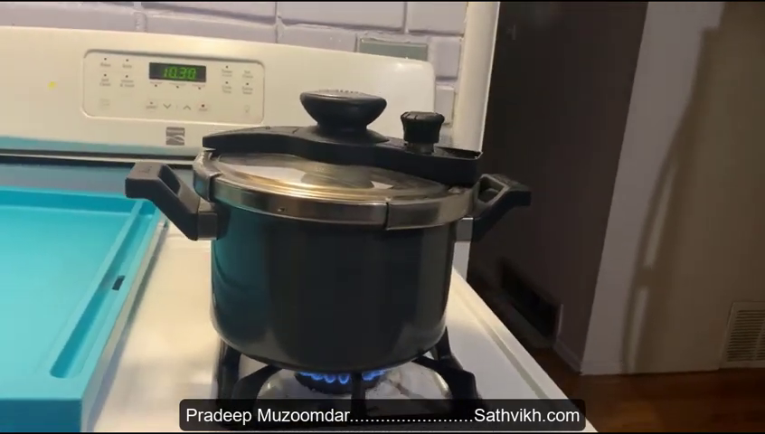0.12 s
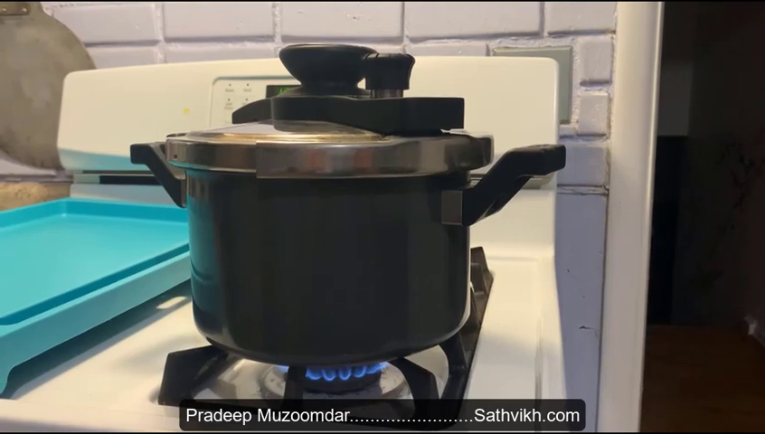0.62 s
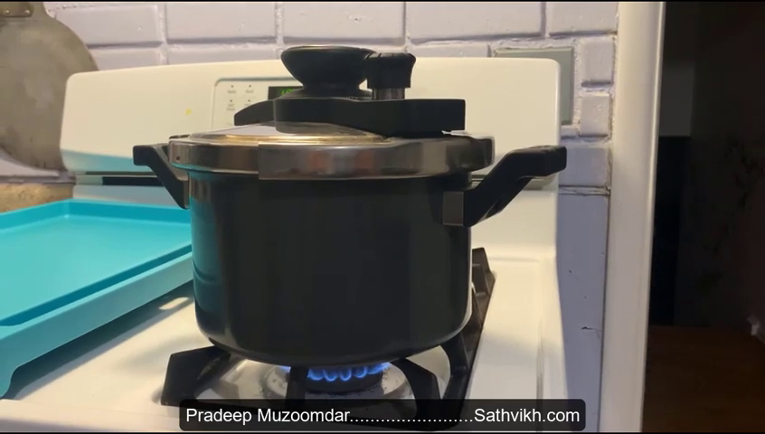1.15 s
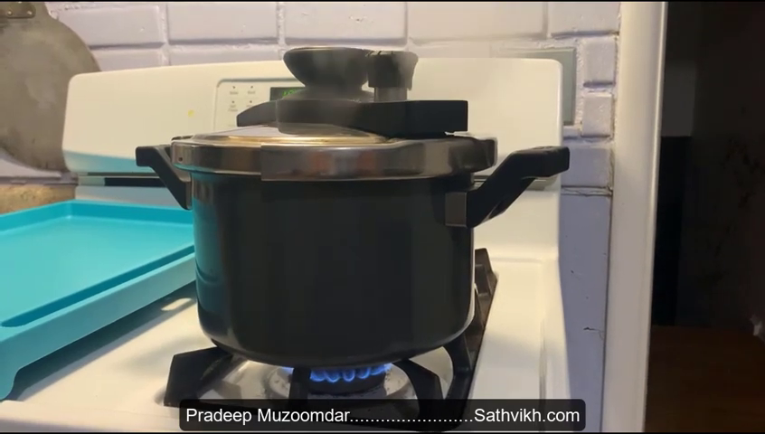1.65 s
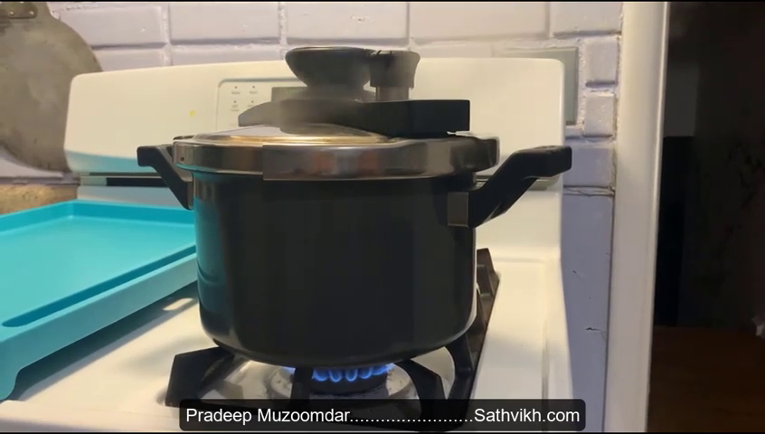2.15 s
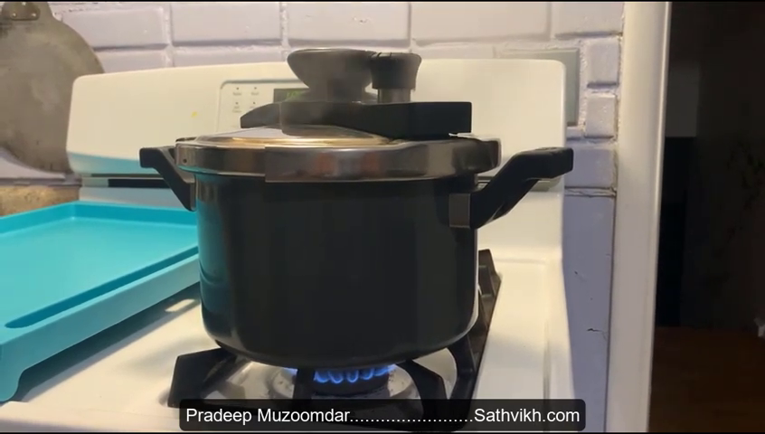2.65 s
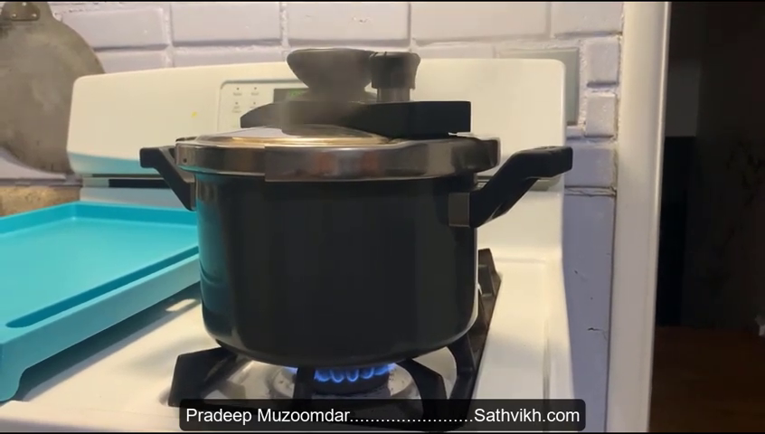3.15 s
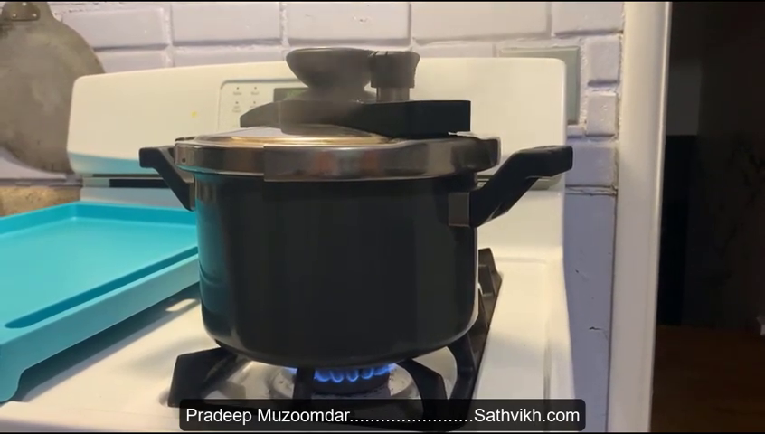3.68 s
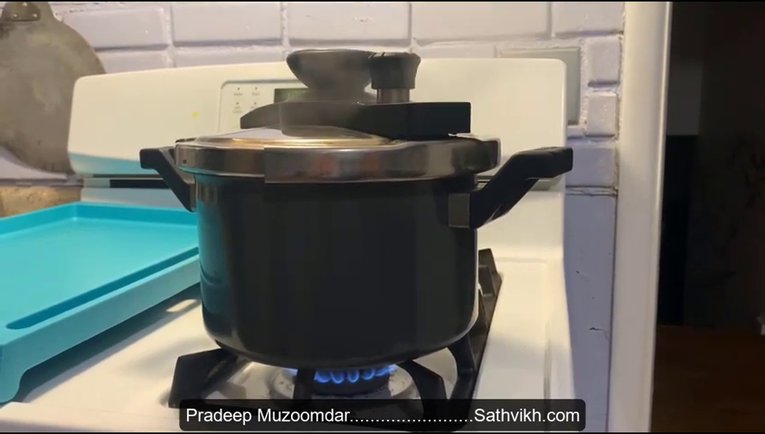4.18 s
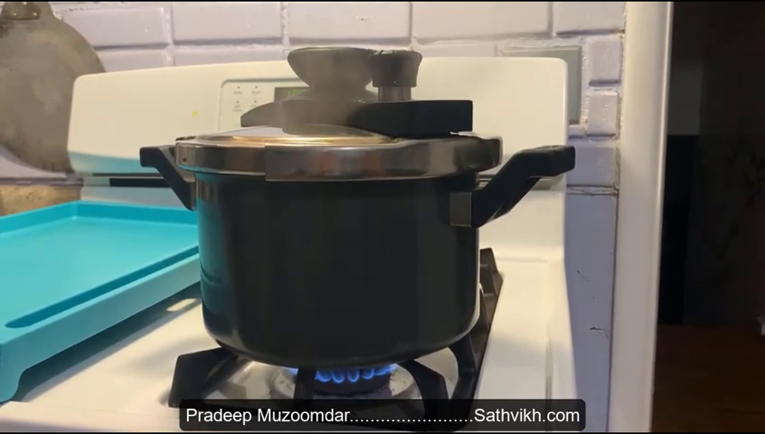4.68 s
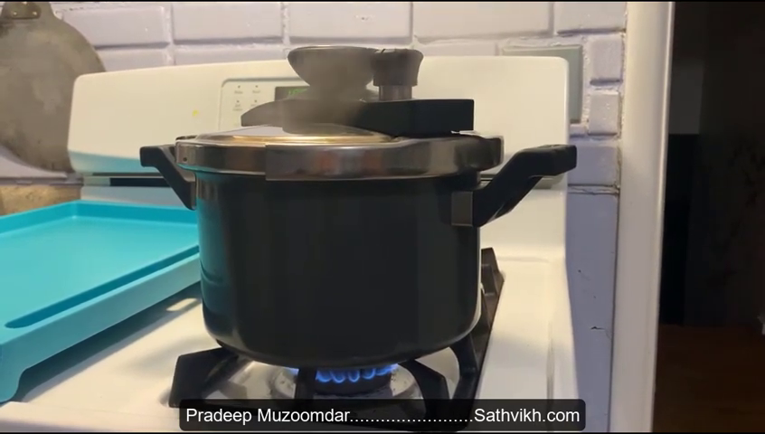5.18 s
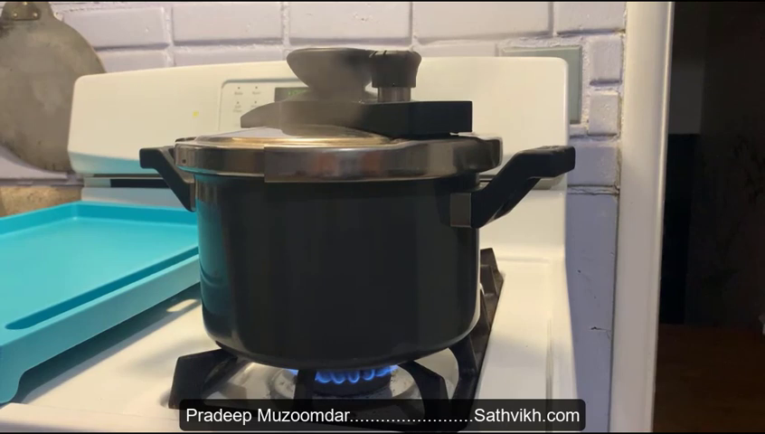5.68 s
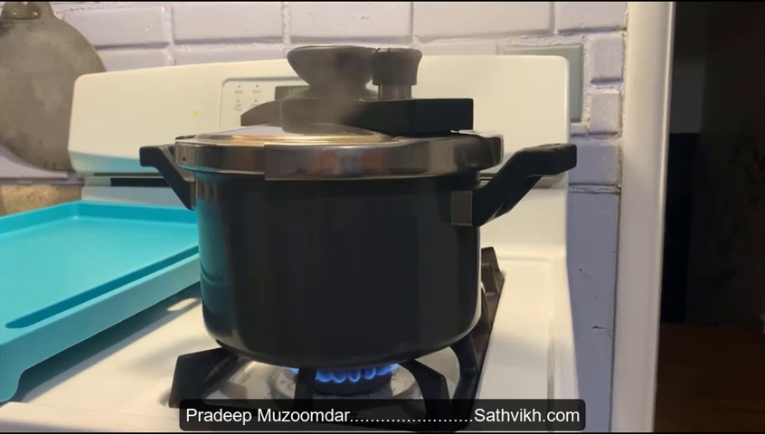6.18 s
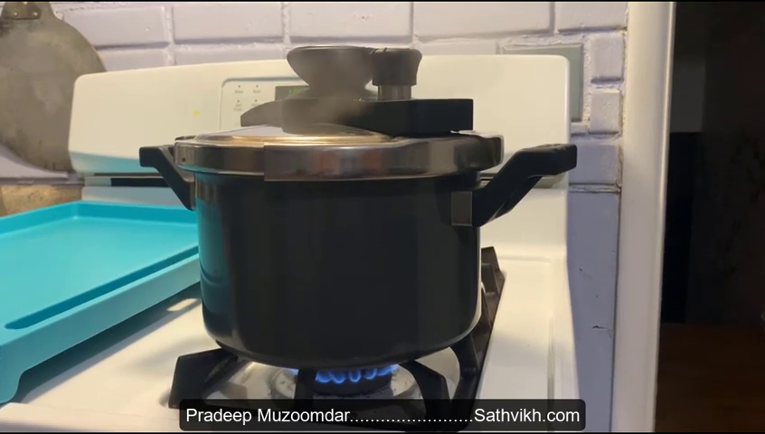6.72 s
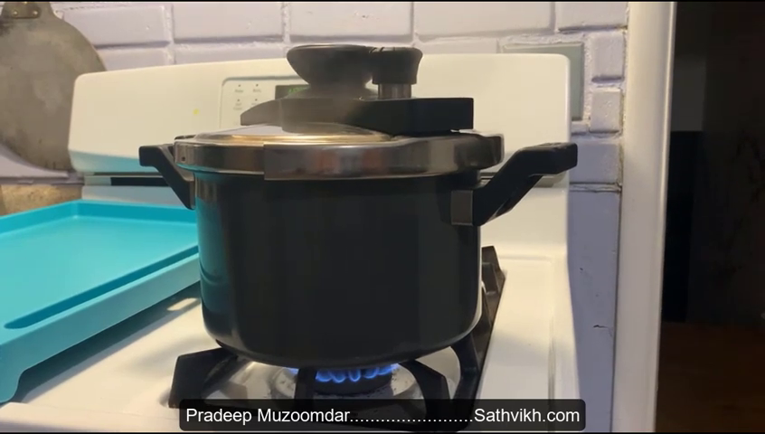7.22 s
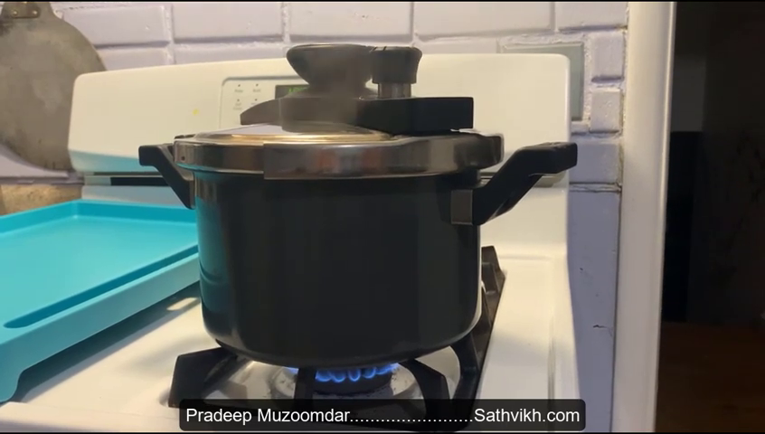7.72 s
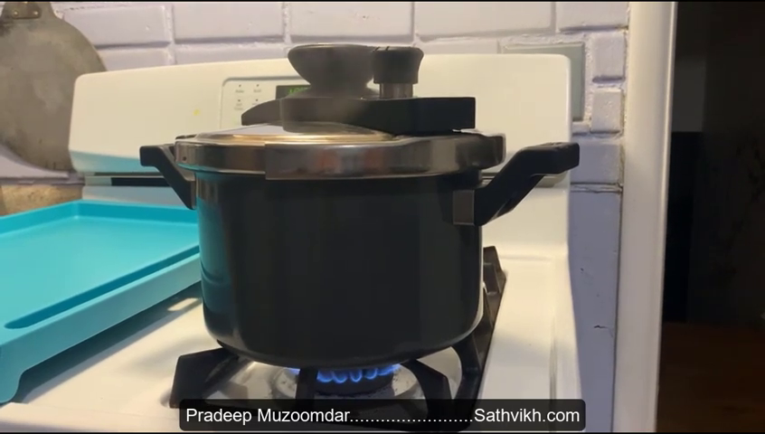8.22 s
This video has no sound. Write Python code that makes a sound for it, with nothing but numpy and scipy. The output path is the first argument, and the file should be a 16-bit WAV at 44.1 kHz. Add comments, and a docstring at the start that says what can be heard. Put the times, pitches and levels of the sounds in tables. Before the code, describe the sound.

A handheld stereo microphone near a stove hears a very quiet start, with low hum and flame rumble. Weak steam leaks in little swelling spurts for under a second, then a sudden puff opens into a strong, rough gush of steam and water. The gush drops to a continuous piercing hiss, slightly uneven, briefly fuller at times, fairly dry and close in a small kitchen.

```python
"""A pressure cooker on a gas stove, heard by the two microphones of a phone at arm's length.
A last hiss (shaped noise) dies away over a low hum (ringing noise) and the rumble of flame and pot.
Steam, made of uneven noise and droplets, leaks under the rocking weight; the valve lifts with a puff
and a wet burst, during which narrow, short gaps are heard below 2900 Hz. Then the jet hisses on;
in some spells more is heard below 7780 Hz."""
import sys
import numpy as np
from scipy import signal
from scipy.fft import rfft, irfft, next_fast_len
from scipy.io import wavfile
from scipy.ndimage import uniform_filter1d

SR = 44100
rng = np.random.default_rng(int(sys.argv[2]) if len(sys.argv) > 2 else 0)


def put_to_file(sound):
    """Save the sound as 16-bit audio at rate SR, in the file named by the first command-line argument."""
    columns = np.atleast_2d(sound).T  # one column per channel
    safe = np.clip(columns, -1, 1)
    whole_steps = np.round(safe * 32767)
    wavfile.write(sys.argv[1], SR, whole_steps.astype(np.int16))


def boost(x):
    """Linear amplitude factor 10**(x/20) for a level x in decibels (scalar or array-like)."""
    u = np.asarray(x, float) / 20
    return 10 ** u


N = 368235  # length in samples
SIZE = next_fast_len(N)  # working length, quick to transform
HZ = np.arange(SIZE // 2 + 1) * SR / SIZE
TIME_S = np.arange(SIZE) / SR
LOUD_DB = -11.5  # treble level above which gaps are heard and the stereo centre is turned down


def rms(x):
    """Root mean square: the average strength of a sound."""
    return np.sqrt(np.mean(x ** 2))


def coloured(x, points):
    """Spectrum of x, made louder or softer along a curve of (Hz, dB) points."""
    hz, db = np.transpose(points)
    return rfft(x) * boost(np.interp(np.log(HZ + 1), np.log(hz), db))


def fade():
    """The last hiss: soft, broad noise that sinks away before the leak starts."""
    # tone of the last hiss: pitch_hz [Hz], level_db [dB, relative]
    fade_colour = [(200, -8), (600, 1), (2200, -2), (3000, 4), (8500, -2.5), (10500, -6), (12000, -12),
                   (13500, -11), (15500, -14)]
    from_db, towards_db, time_constant_s = -48, -66.5, 0.11
    hiss = irfft(coloured(rng.standard_normal((2, SIZE)), fade_colour), SIZE)
    hiss += 0.47 * hiss[::-1]  # partly common to both microphones
    level_db = towards_db + (from_db - towards_db) * np.exp(-TIME_S / time_constant_s)
    return boost(level_db) * hiss / rms(hiss)


def kitchen():
    """Reflections of the room, different at each microphone: an early dying part and a scattered late part."""
    early_t60_s = 0.15  # time for the early part to fall by 60 dB
    late_share = 0.6  # share of the energy that is too late and scattered to colour the sound
    t = np.arange(SR // 2) / SR
    tails = rng.standard_normal((2, len(t))) * boost(-60 * t / early_t60_s) * (t > .002)
    early = rfft(tails / np.sqrt(np.sum(tails ** 2, axis=1, keepdims=True)), SIZE)
    late = np.exp(2j * np.pi * rng.random((2, len(HZ))))
    return np.sqrt(1 - late_share) * early + np.sqrt(late_share) * late


def ports(direct):
    """Both microphones hear the direct sound and near echoes, shifted in phase, plus their own reflections."""
    # the two microphone ports: pitch_hz [Hz], lead of the right [radians],
    # share common to both [0-1], left minus right level [dB]
    port_table = [(0, 0, .05, 0), (150, 0, .3, 0), (300, 0, .65, 0), (1000, -.1, .75, 0),
                  (1900, -.6, .4, .5), (2700, -1.4, .25, .5), (3900, -3.05, .58, -1.5),
                  (5200, -3.1, .62, -1.5), (6000, -1.7, .4, -2.5), (6500, 1.2, .2, -.5), (7200, 2.0, .7, 0),
                  (8000, 2.35, .85, 0), (8450, 3.05, .99, 0), (8750, 3.25, .99, 0), (9500, 4.7, .85, 0),
                  (10650, 6.0, .97, 0), (11000, 6.28, .99, 0), (11350, 6.6, .97, 0), (12400, 8.1, .65, 0),
                  (13150, 9.3, .99, 0), (13600, 9.55, .99, 0), (14500, 11.1, .9, 0), (15700, 12.57, .98, 0)]
    # stove back, wall and counter: delay_ms [ms], level_db [dB]
    near_echoes = [(1.36, -48), (3.82, -21), (4.83, -34), (6.22, -21), (9.3, -44), (10.17, -16),
                   (12.7, -11.5), (17.4, -10)]
    hz, *columns = np.transpose(port_table)
    lead, share, tilt_db = (np.interp(HZ, hz, c) for c in columns)
    near = 1 + sum(boost(db) * np.exp(-2j * np.pi * HZ * ms / 1000) for ms, db in near_echoes)
    side = np.array([[-.5], [.5]])  # left, right
    common = np.sqrt(share) * near * np.exp(1j * side * lead)
    separate = np.sqrt(1 - share) * kitchen()
    return direct * (common + separate) * boost(-side * tilt_db)


def hum():
    """A low hum, heard until the jet covers it: noise ringing in a few low resonances."""
    # loudness of the hum over time: time_s [s], level_db [dB]
    hum_level = [(0, -59.5), (.3, -58.5), (.32, -55), (.7, -50), (1.1, -48.5), (1.9, -67.5), (8.35, -66.5)]
    # resonances of the hum: pitch_hz [Hz], width_hz [Hz], level_db [dB, relative]
    hum_peaks = [(63, 25, -8), (162, 28, -10), (222, 86, -1), (353, 18, 6)]
    ring = sum(boost(db) / (1 + (2 * (HZ - hz) / width) ** 2) for hz, width, db in hum_peaks)
    sound = irfft(ports(rfft(rng.standard_normal(SIZE)) * ring), SIZE)
    return boost(np.interp(TIME_S, *np.transpose(hum_level))) * sound / rms(sound)


def walk(rate):
    """A random level drawn rate times a second and smoothed twice; its spread is 1."""
    hold = int(SR / rate)
    steps = np.repeat(rng.standard_normal(SIZE // hold + 1), hold)
    smooth = uniform_filter1d(uniform_filter1d(steps, hold), hold)[:SIZE]
    return smooth / smooth.std()


def band(spectra, lo_hz, hi_hz):
    """The part of the sound between two frequencies."""
    return irfft(spectra * ((HZ >= lo_hz) & (HZ < hi_hz)), SIZE)


def flickering(spectra, edges, shared_db, own_db, rate):
    """Every band follows a common slow swell and flickers on its own."""
    swell = shared_db * walk(rate / 3)
    return sum(band(spectra, lo, hi) * boost(swell + own_db * walk(rate))
               for lo, hi in zip(edges, edges[1:]))


def rumble(level_db):
    """Burner flame and simmering pot: low noise that flutters a little."""
    # tone of flame and pot: pitch_hz [Hz], level_db [dB per Hz, relative]
    rumble_colour = [(20, -3), (60, 0), (130, -3), (250, 3.5), (400, -13.5), (700, -19), (2000, -40)]
    spectra = ports(coloured(rng.standard_normal(SIZE), rumble_colour))
    sound = flickering(spectra, np.geomspace(15, 3000, 7), shared_db=0.6, own_db=1.5, rate=16)
    return boost(level_db) * sound / rms(sound)


def turbulence(points, eddy_db, drops, drop_db):
    """Noise that bunches with the eddies, plus sharp droplets (drops a second) of uneven size."""
    noise = rng.standard_normal(SIZE) * boost(eddy_db * walk(600))
    is_drop = rng.random(SIZE) < drops / SR
    noise += is_drop * rng.standard_normal(SIZE) * boost(drop_db)
    return ports(coloured(noise, points))


def centre_change(spectra, level_db, heard_db):
    """What to add to one band, 3680 to 4750 Hz, to turn its stereo centre up or down."""
    centre = band(spectra, 3680, 4750).mean(axis=0)
    neutral_db, per_heard, per_loud = 0.1, 0.44, 0.58  # the last two in dB per dB
    centre_db = per_heard * (heard_db - neutral_db) - per_loud * np.maximum(level_db - LOUD_DB, 0)
    return boost(heard_db) * (boost(centre_db) - 1) * centre


def jet(level_db, heard_db):
    """Steam rushing through the valve: turbulent noise; heard_db sets how much is heard below 7780 Hz."""
    # jet through the valve's gaps and cap: pitch_hz [Hz], level_db [dB per Hz, relative]
    jet_colour = [(400, -46), (1100, -26), (2050, -17.5), (2650, -14.5), (3100, -10), (4800, -10.5),
                  (5700, -8), (6900, -8.5), (7700, -6), (8150, -.5), (8700, 1), (9300, -4.5), (11100, -3),
                  (12500, -10), (14100, 1), (15700, -2.5)]
    edge_hz = 7780
    spectra = turbulence(jet_colour, eddy_db=0.6, drops=75, drop_db=8.5)
    treble = flickering(spectra, np.linspace(edge_hz, 16500, 7), shared_db=0.78, own_db=0.38, rate=12)
    body = flickering(spectra, np.geomspace(2700, edge_hz, 6), shared_db=0.0, own_db=0.52, rate=12)
    shoulder = flickering(spectra, np.geomspace(2000, 2700, 3), shared_db=1.35, own_db=1.1, rate=13)
    skirt = flickering(spectra, np.geomspace(200, 2000, 5), shared_db=-0.7, own_db=1.07, rate=12)
    below = boost(heard_db) * body + boost(0.06 * heard_db) * shoulder + boost(.2 * heard_db) * skirt
    below += centre_change(spectra, level_db, heard_db)
    return boost(level_db) * (treble + below) / rms(treble)


def roar(level_db):
    """Water spitting with the steam: wet, broad noise, with a sudden puff as the weight lifts."""
    # tone of the spitting: pitch_hz [Hz], level_db [dB per Hz, relative]
    roar_colour = [(30, -6), (110, -9.5), (380, -4), (650, -0.5), (950, -2.5), (1300, 1), (2600, -4),
                   (6000, -17)]
    puff_start_s, puff_db, puff_decay_s = 1.138, -22.5, 0.013
    spectra = turbulence(roar_colour, eddy_db=1.0, drops=55, drop_db=12)
    sound = flickering(spectra, np.geomspace(50, 12000, 12), shared_db=-1.27, own_db=2.0, rate=14)
    since = TIME_S - puff_start_s
    puff = boost(puff_db) * (since > 0) * np.exp(-np.abs(since) / puff_decay_s)
    return (boost(level_db) + puff) * sound / rms(band(spectra, 510, 1270))


def low_gaps(x, treble_db):
    """At high level, narrow and short gaps are heard below 2900 Hz: random dips in pitch and time."""
    depth_per_spread_db, onset_range_db, top_hz = 22, 1.9, 2900
    hz, s, cells = signal.stft(x, SR, nperseg=1024)
    onset = np.clip((np.interp(s, TIME_S, treble_db) - LOUD_DB) / onset_range_db, 0, 1)
    depth_db = depth_per_spread_db * onset * (hz < top_hz)[:, None]
    # random blotches, smoothed over two bins in pitch and six frames in time
    chance = uniform_filter1d(rng.standard_normal(depth_db.shape), size=2, axis=0)
    chance = uniform_filter1d(chance, size=6, axis=1)
    # only the dips count; the small lift partly makes up for them
    gain = boost(depth_db * (np.minimum(chance / chance.std(), 0) + 0.04))
    return signal.istft(cells * gain, SR, nperseg=1024)[1][:, :SIZE]


def ramp(start, length):
    """0 before start, rising evenly to 1 over length seconds."""
    return np.clip((TIME_S - start) / length, 0, 1)


def bumps(rows, half):
    """Triangular swells in dB around the listed moments; half is the rise or fall time in seconds."""
    return sum(db * (ramp(s - half, half) - ramp(s, half)) for s, db in rows)


def valve_state(leaking, bursting, steady):
    """A value that moves from leaking to bursting as the valve lifts, then to steady as it settles."""
    lifted = ramp(1.15, 0.046)
    settled = ramp(1.819, 0.13)
    return leaking + lifted * (bursting - leaking) + settled * (steady - bursting)


def valve():
    """Steam flow, valve state and events set the levels of jet, roar and rumble in dB."""
    # steam flow through the valve: time_s [s], level_db of the jet's treble [dB]
    steam_flow = [(0.31, -30), (1.04, -29), (1.09, -24.5), (1.14, -15), (1.19, -10), (1.31, -5), (1.37, -8),
                  (1.65, -7.3), (1.82, -8.5), (1.9, -12), (2.35, -11.5), (2.8, -12.5), (4.4, -12.5),
                  (6.5, -13.5), (7.4, -14.3), (8.1, -13.5), (8.35, -14.5)]
    # rocks of the weight that let the leak swell: time_s [s], gain_db on the jet [dB]
    weight_rocks = [(0.45, 3), (0.59, 4), (0.76, 5.5), (0.95, 4)]
    # slugs of water thrown out in the burst: time_s [s], gain_db on the roar [dB]
    water_slugs = [(1.245, 15.5), (1.46, 2), (1.65, 1)]
    shut_db = -60 * (1 - ramp(0.3105, 0.0032))  # until steam starts to leak under the weight
    rock = bumps(weight_rocks, half=0.085)
    slug = bumps(water_slugs, half=0.11)
    jet_db = np.interp(TIME_S, *np.transpose(steam_flow)) + rock + shut_db
    roar_db = valve_state(-52.5, -36.5, -54) + 0.5 * rock + slug + shut_db
    rumble_db = valve_state(-56, -42, -66.5) + 0.25 * slug + 0.12 * shut_db
    return jet_db, roar_db, rumble_db


def heard_spells():
    """Gain in dB over time: in some spells more is heard below 7780 Hz."""
    # spells in which more is heard: start_s [s], length_s [s], gain_db [dB]
    spell_table = [(2.392, 0.22, 3.5), (4.306, 0.16, 4), (5.0, 0.07, 4), (5.235, 0.21, 4),
                   (6.13, 0.047, 3.5), (6.817, 1.24, 4)]
    step_s = 0.051  # time a spell takes to rise or fall
    return sum(db * (ramp(s, step_s) - ramp(s + length, step_s)) for s, length, db in spell_table)


def scene():
    """The valve drives jet, roar and rumble; spells and gaps shape what is heard; hum and hiss are added."""
    jet_db, roar_db, rumble_db = valve()
    spell = heard_spells()
    heard_db = valve_state(4.9, 1.9, -1.31) + spell  # how much of the jet is heard below 7780 Hz
    cooker = jet(jet_db, heard_db) + roar(roar_db + spell) + rumble(rumble_db + 1.64 * spell)
    return (low_gaps(cooker, jet_db) + hum() + fade())[:, :N]


def top_cut(x):
    """Nothing passes above the cut-off."""
    return signal.sosfilt(signal.butter(12, 16090, fs=SR, output="sos"), x)


def record(dry):
    """Peaks beyond 1.5 times full scale are clipped, then the top is cut steeply above 15610 Hz."""
    clipped = np.clip(dry, -1.5, 1.5)
    low_pass = signal.ellip(12, .2, 70, 15610, fs=SR, output="sos")  # ripple and stop depth in dB
    mix = signal.sosfilt(low_pass, clipped)
    return top_cut(mix)


dry = scene()
out = record(dry)
put_to_file(out)
```